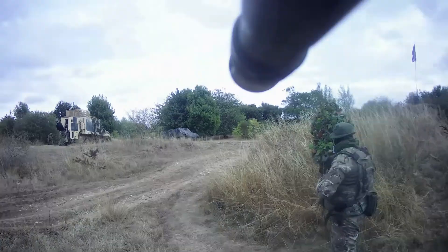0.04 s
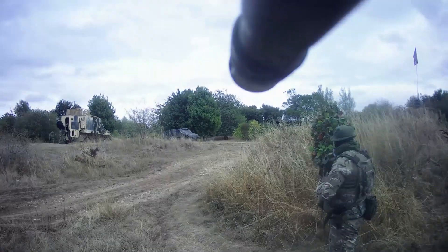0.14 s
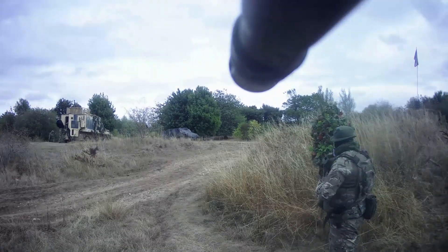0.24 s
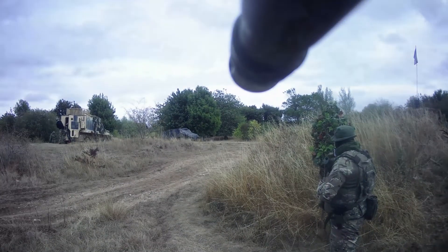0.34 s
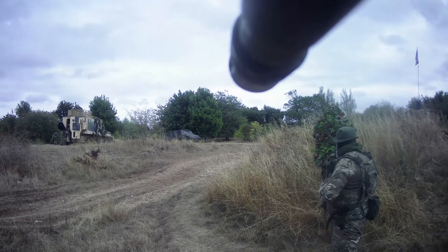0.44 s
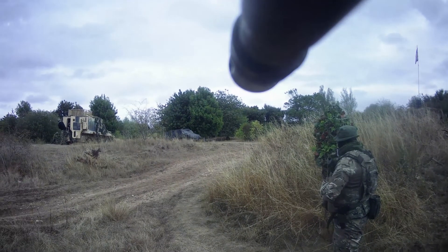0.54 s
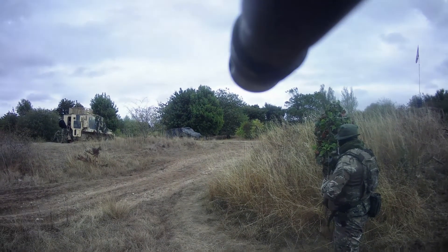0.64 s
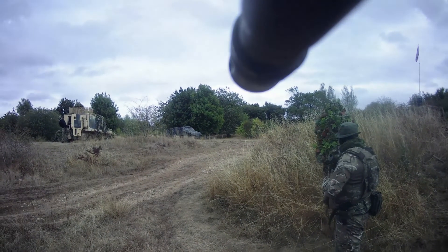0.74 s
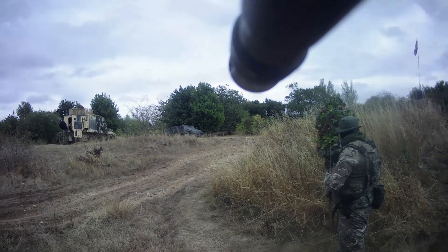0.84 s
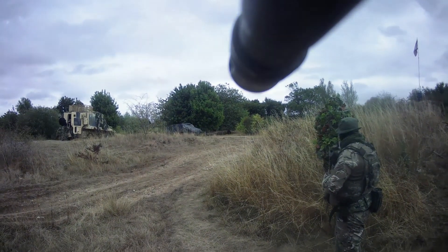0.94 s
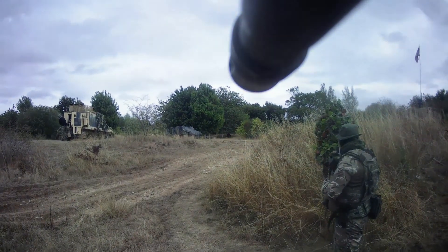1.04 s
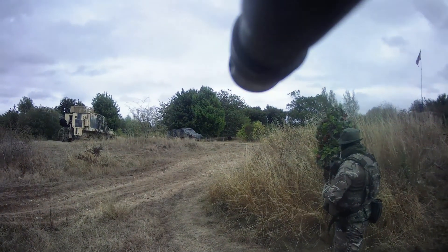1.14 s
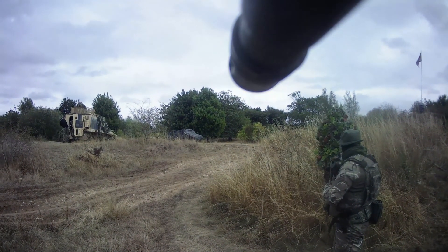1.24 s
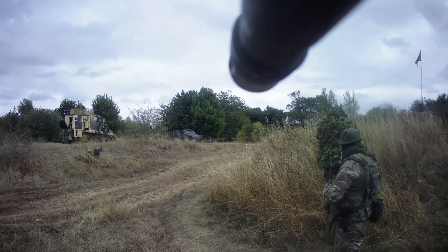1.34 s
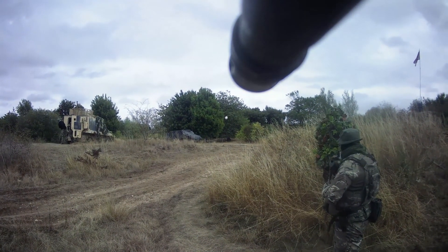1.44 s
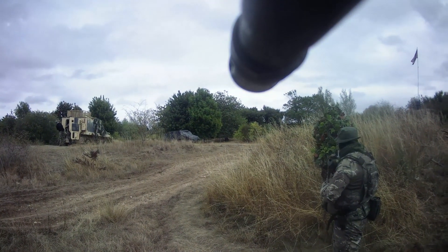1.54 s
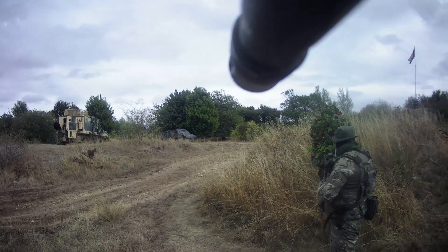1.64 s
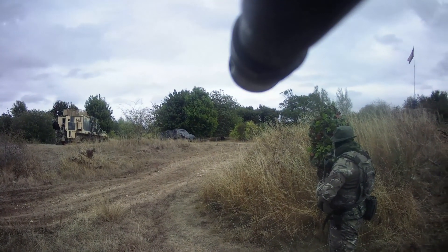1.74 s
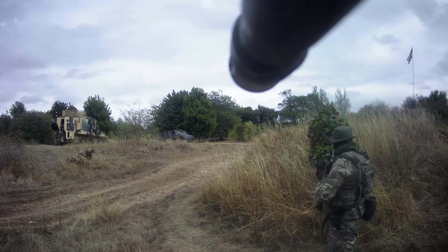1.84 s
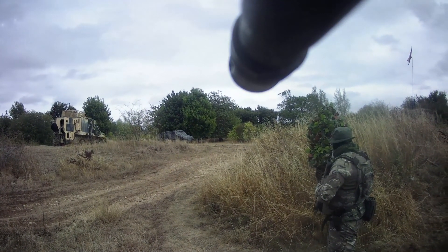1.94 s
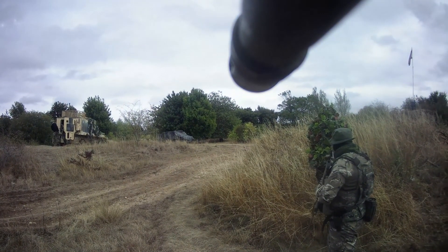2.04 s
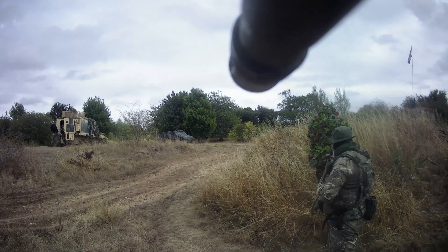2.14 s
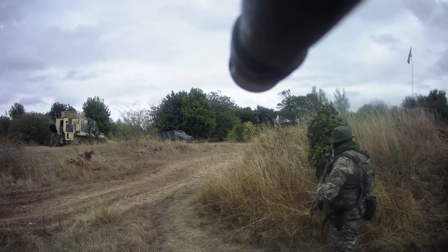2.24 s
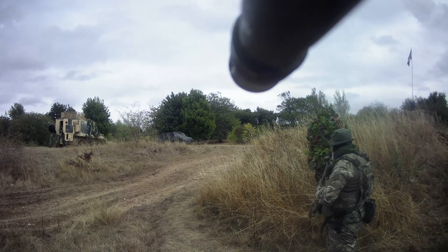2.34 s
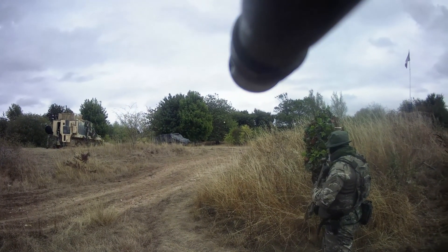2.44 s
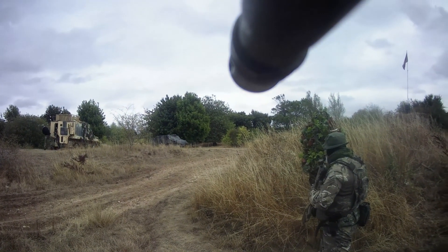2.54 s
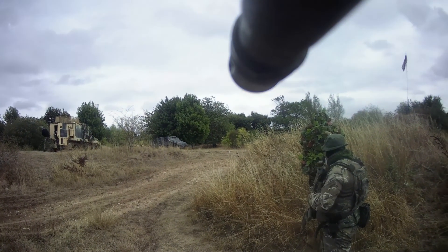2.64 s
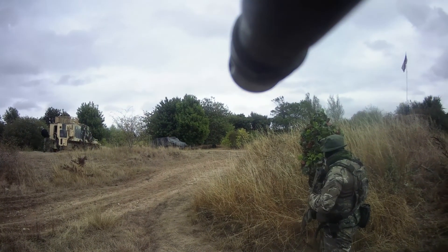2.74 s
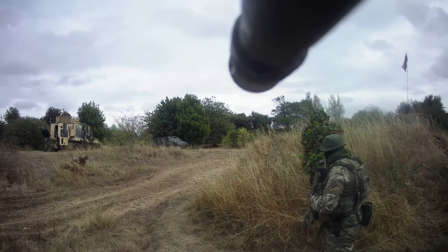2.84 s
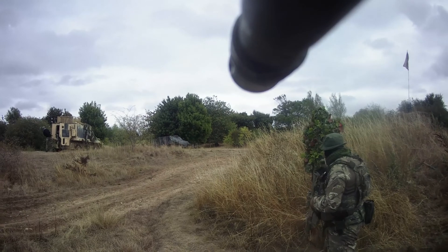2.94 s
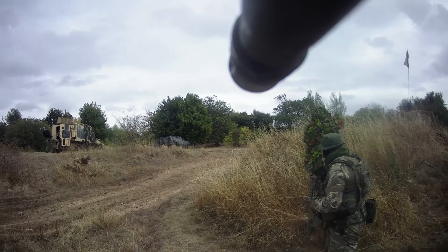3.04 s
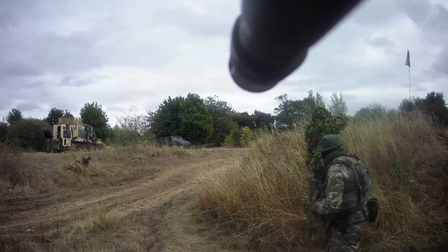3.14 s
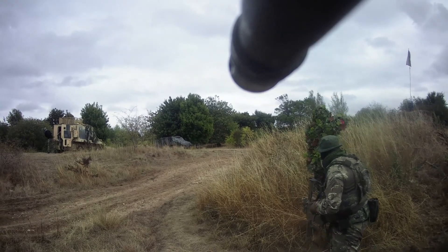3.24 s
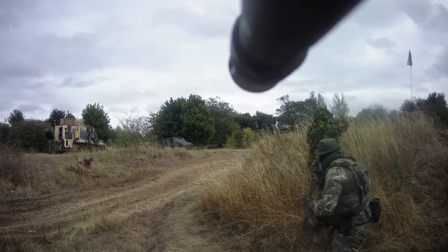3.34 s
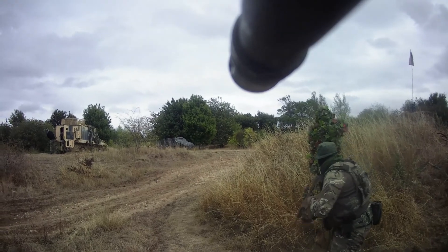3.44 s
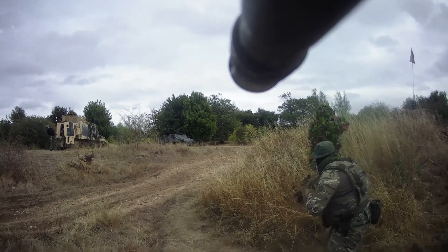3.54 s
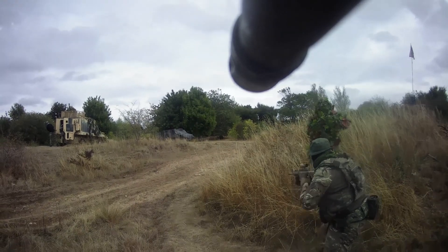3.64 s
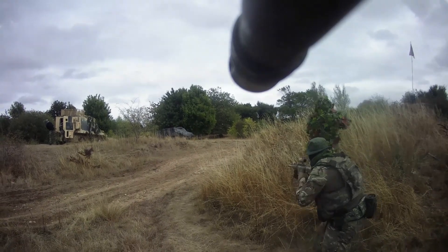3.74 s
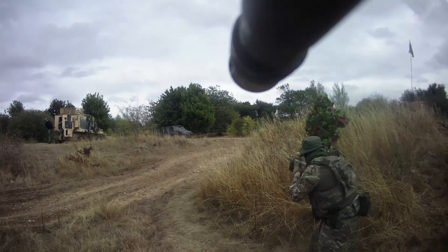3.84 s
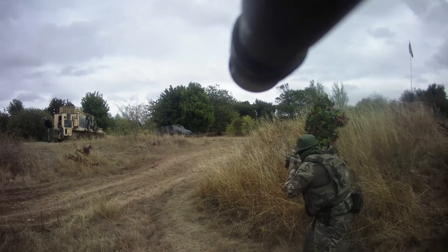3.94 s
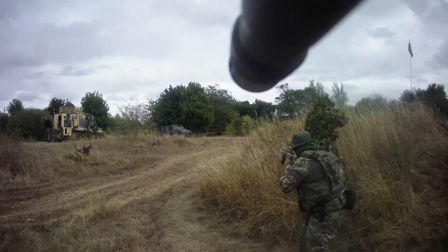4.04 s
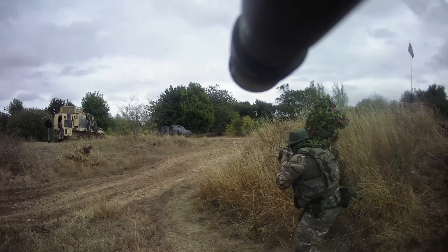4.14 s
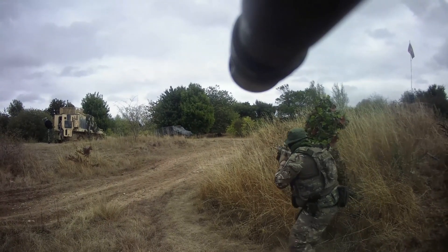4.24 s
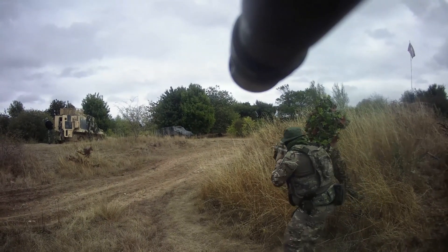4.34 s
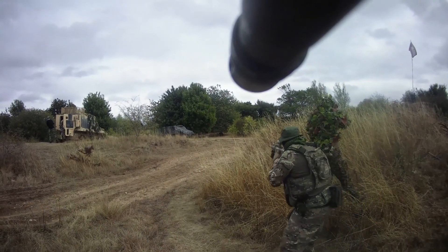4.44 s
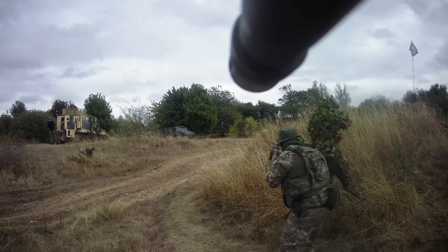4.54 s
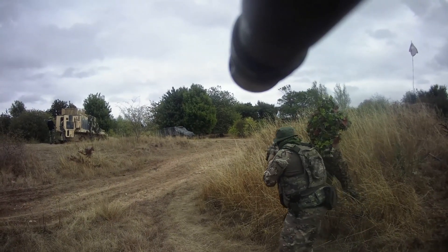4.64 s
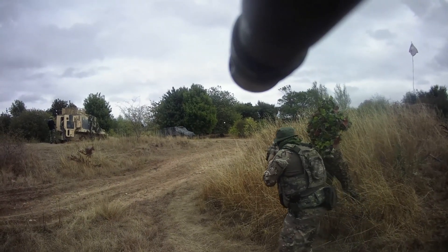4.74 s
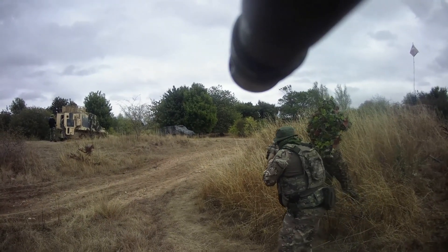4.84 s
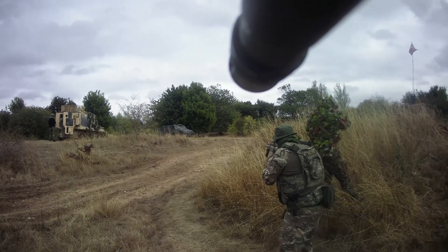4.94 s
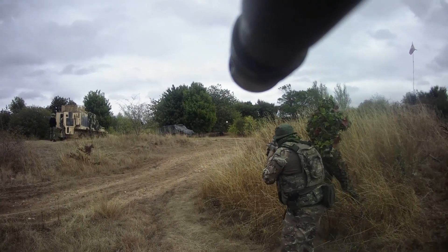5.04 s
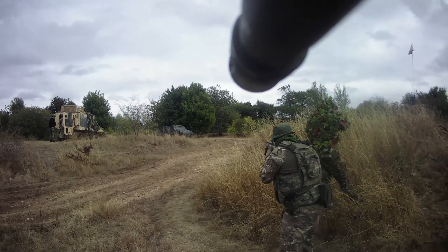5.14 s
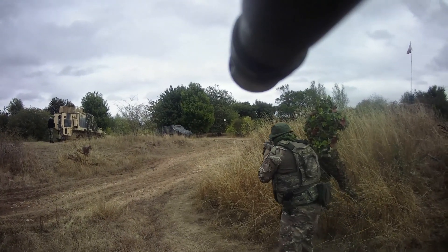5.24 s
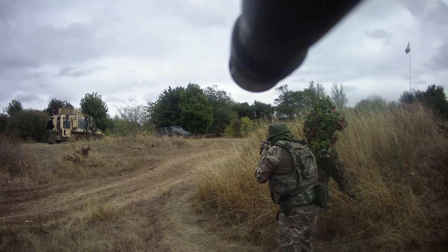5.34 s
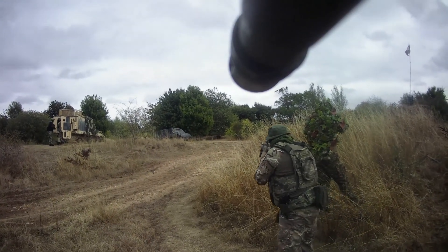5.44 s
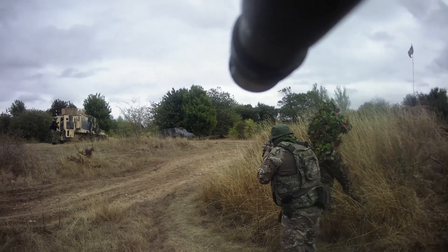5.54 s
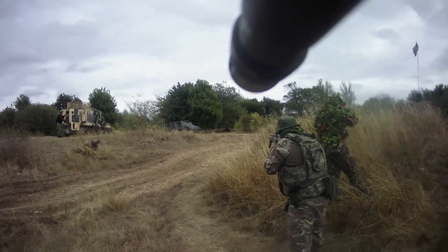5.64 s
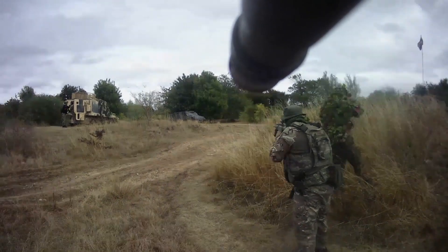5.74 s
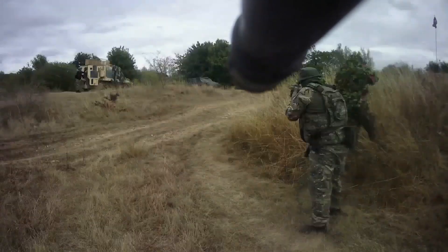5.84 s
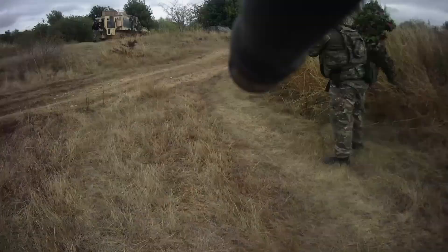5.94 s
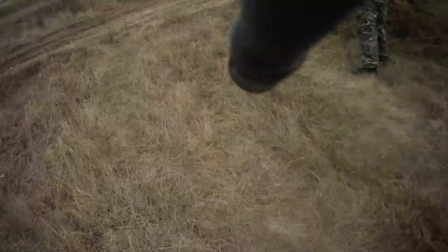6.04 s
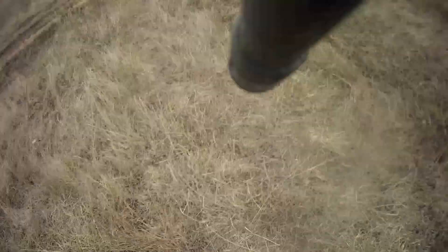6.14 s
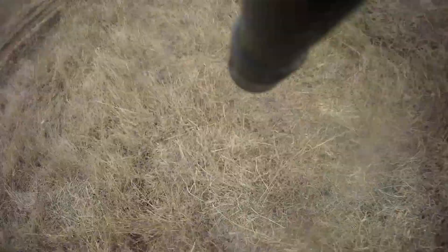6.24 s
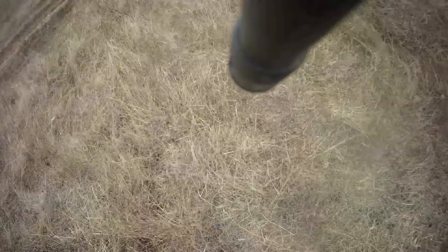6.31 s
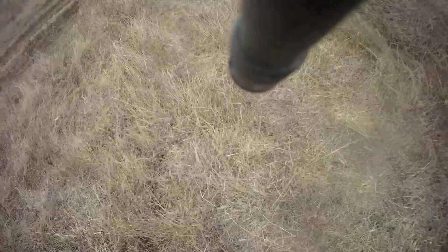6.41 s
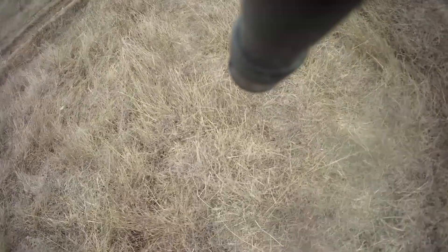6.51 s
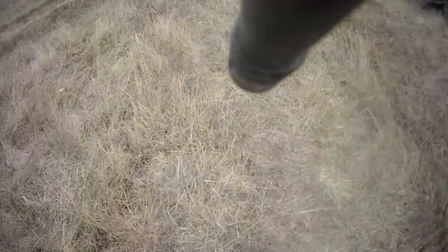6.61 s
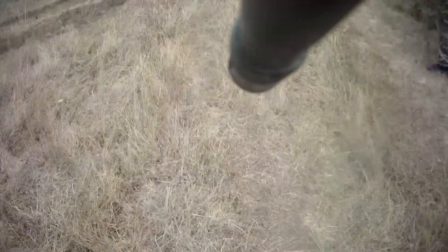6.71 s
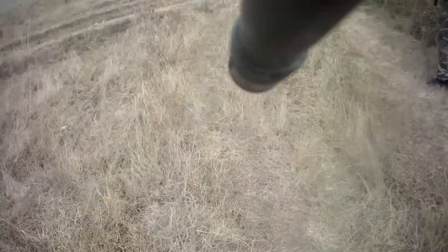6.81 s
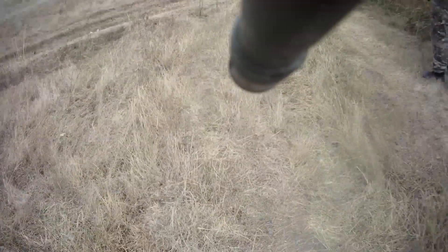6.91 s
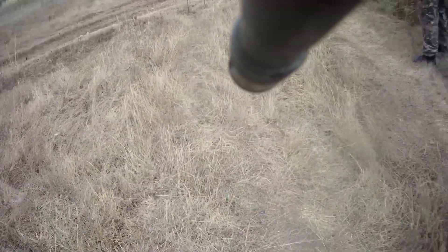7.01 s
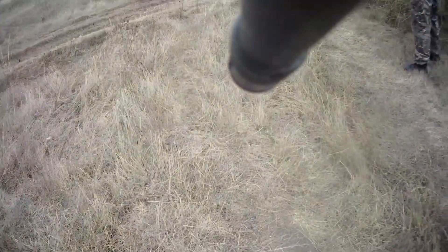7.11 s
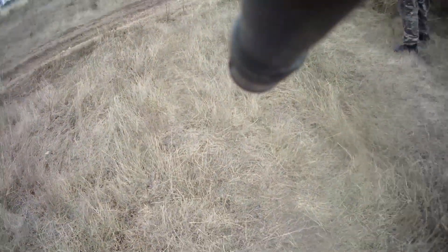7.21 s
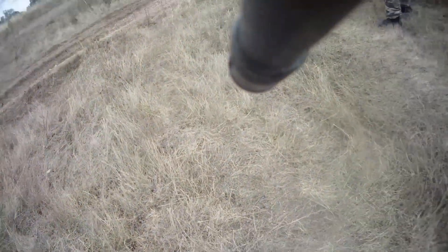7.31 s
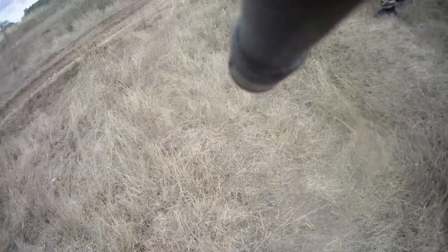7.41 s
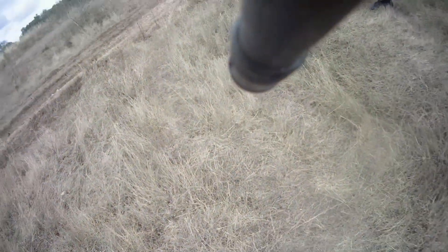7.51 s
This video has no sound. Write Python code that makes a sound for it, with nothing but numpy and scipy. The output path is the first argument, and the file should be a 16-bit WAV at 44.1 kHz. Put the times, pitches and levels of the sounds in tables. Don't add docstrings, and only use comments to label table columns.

```python
import sys
import numpy as np
from scipy import signal
from scipy.fft import rfft, irfft
from scipy.io import wavfile

SR = 44100
rng = np.random.default_rng(int(sys.argv[2]) if len(sys.argv) > 2 else 0)


def unload_audio(sound):
    columns = np.transpose(np.atleast_2d(sound))
    steps = np.round(np.clip(columns, -1, 1) * 32767)
    wavfile.write(sys.argv[1], SR, steps.astype(np.int16))


def how_loud(loudness_db):
    steps = np.asarray(loudness_db, float) / 20
    return 10 ** steps


N = 333837

# pawl click t/s, scrape level/dB, pawl level/dB
WHEEL_STROKES = [(5.8521, -57.5, -30), (6.0343, -58, -29.5), (6.241, -50.5, -45), (6.4433, -57.5, -25),
                 (6.563, -68, -34.5), (6.6418, -58.5, -25.5), (6.8153, -58.5, -27), (6.995, -59, -29),
                 (7.164, -59, -30), (7.3344, -59, -30.5), (7.5001, -60, -26.5)]
# t/s, peak level/dB
RATCHET_CLICKS = [
    (1.8716, -46.5),
    (1.915, -50.5),
    (1.9589, -51),
    (2.0005, -47.5),
    (4.158, -50.5),
    (4.2689, -52),
]


def resonance(x, hz, width_hz):
    r = np.exp(-np.pi * width_hz / SR)
    poles = [1, -2 * r * np.cos(2 * np.pi * hz / SR), r * r]
    return signal.lfilter(np.array([1, 0, -1]) * (1 - r * r) / 2, poles, x)


def ring(clicks, hz, t60):
    r = how_loud(-60 / (t60 * SR))
    w = 2 * np.pi * hz / SR
    return signal.lfilter([0, np.sin(w)], [1, -2 * r * np.cos(w), r * r], clicks + 1e-18)


def blow(clicks, hz, t60):
    return resonance(ring(clicks, hz, t60), hz, hz)


def train(times, gains):
    out = np.zeros(N)
    places = np.clip((np.asarray(times) * SR).astype(int), 0, N - 1)
    np.add.at(out, places, gains)
    return out


def dying(clicks, t60):
    return signal.lfilter([1], [1, -how_loud(-60 / (t60 * SR))], clicks + 1e-18)


def band(x, low_hz, high_hz):
    return signal.sosfilt(signal.butter(2, [low_hz, high_hz], "band", fs=SR, output="sos"), x)


def drift(rate):
    r = np.exp(-2 * np.pi * rate / SR)
    slow = signal.lfilter([1], [1, -2 * r, r * r], rng.standard_normal(N + SR))[SR:]
    return slow / slow.std()


def coloured(spectrum):
    hz, level_db = np.transpose(spectrum)
    grid = np.maximum(np.fft.rfftfreq(N, 1 / SR), 1)
    gain = how_loud(np.interp(np.log(grid), np.log(hz), level_db))
    out = irfft(rfft(rng.standard_normal(N)) * gain, N)
    return out / out.std()


def body(force):
    # f/Hz, width/Hz, level/dB
    shell_modes = [(660, 136.6, 2.5), (810, 190, 0), (917, 129, 0.5), (1327, 80, 1.5), (1585, 336, -2),
                   (2056, 93, 2.5), (2316, 213, -3.5), (2943, 300, -7), (3323, 118, 1.5), (3550, 104.5, 3),
                   (4170, 245, -10.5)]
    # f/Hz, width/Hz, level/dB
    fittings = [(5913, 860, -22), (5830, 170, -39.5), (6630, 380, -21.5), (7200, 350, -27),
                (8100, 180, -37.5), (8300, 410, -36), (9770, 800, -38)]
    rung = sum((-1) ** k * how_loud(db) * resonance(force, hz, width) for k, (hz, width, db) in enumerate(shell_modes))
    shell = signal.sosfilt(signal.butter(4, 4600, fs=SR, output="sos"), band(rung, 350, 10000))
    metal = sum(how_loud(db) * resonance(resonance(force, hz, width), hz, width) for hz, width, db in fittings)
    return shell + metal


def air():
    # t/s, gust level/dB, grip level/dB
    weather = [(0, -84, -77.5), (.2, -72, -76), (.7, -69.5, -72), (.88, -63, -76.5), (1.06, -61, -76.5),
               (1.39, -76, -74), (2.04, -76, -69.5), (2.88, -59, -62.5), (3.07, -59.5, -70),
               (4.04, -67.5, -61), (4.19, -59, -69.5), (4.42, -60, -65.5), (5.76, -54, -52),
               (6.09, -59, -52.5), (6.4, -49, -50.5), (7.054, -53.5, -50.5), (7.176, -57, -56.5),
               (7.57, -55.5, -53)]
    # f/Hz, level/dB per Hz
    buffet = [(15, -8), (40, -8), (90, 0), (150, 1.5), (230, -0.5), (330, -19), (600, -53)]
    # f/Hz, level/dB per Hz
    rub = [(120, -29.5), (220, -1), (330, -2), (550, -8), (850, -17), (1500, -24), (4000, -58.5)]
    # f/Hz, level/dB per Hz
    field = [(150, -20.5), (350, -10.5), (670, -2.5), (1500, -5), (2200, -13), (3200, -18), (5000, -25.5),
             (12000, -53.5)]
    s, buffet_db, rub_db = np.transpose(weather)
    field_db = -70.5 + 0.03 * (rub_db - rub_db.mean())
    t = np.arange(N) / SR
    out = 0
    layers = ((buffet_db, 2.5, 14, buffet), (rub_db, 2.5, 20, rub), (field_db, 1.5, 15, field))
    for level_db, lump_db, lump_hz, spectrum in layers:
        level = how_loud(np.interp(t, s, level_db) + lump_db * drift(lump_hz))
        out = out + level * coloured(spectrum)
    return out


def hums():
    # start t/s, end t/s, f/Hz, level/dB
    singing = [
        (0.054, 0.152, 1410, -71),
        (.18, 0.256, 1420, -76),
        (0.005, 0.332, 682, -75),
        (2.86, 3.062, 3550, -82),
        (2.867, 3.075, 660, -69),
        (4.03, 4.401, 660, -70),
        (1.87, 2.04, 4300, -86),
        (6.523, 6.581, 667, -45),
    ]
    t = np.arange(N) / SR
    noise = rng.standard_normal(N)
    out = 0
    for start, end, hz, db in singing:
        fade = np.interp(t, [start, start + 0.011, end - .015, end], [0, 1, 1, 0])
        out = out + how_loud(db + 31.0) * fade * resonance(resonance(noise, hz, 35), hz, 35)
    return out


def ticks():
    # t/s, peak level/dB, bright part level/dB
    crisp = [(.0353, -45.5, -28), (0.115, -51, -7), (.1426, -41.5, -7), (.3242, -45, -15),
             (.3441, -33, -7.5), (.3574, -37.5, -13), (.3834, -48, -21), (.5132, -41.5, -17),
             (.6389, -43, -23), (.7168, -50, -6), (.7866, -37.5, -7), (.853, -40, -2), (.8749, -37, -10),
             (0.9962, -58, 9), (1.0071, -42.5, -5), (1.0695, -53, -17), (1.3397, -39.5, -11),
             (4.395, -52, -30), (4.0394, -41, -15), (4.0637, -43, -9), (5.721, -32, -8), (5.9165, -53, -14),
             (6.115, -42.5, -7), (6.222, -32, -12), (6.1384, -25.5, -10), (6.1759, -45, -21),
             (6.3545, -43, -20), (6.4243, -46, -17), (6.6099, -27.5, -26), (6.7506, -38, -10),
             (6.9416, -50, -12)]
    # t/s, peak level/dB
    dull = [(.4848, -55), (.5432, -51), (.5574, -58), (.8076, -56), (.9018, -54), (.9664, -53),
            (.9777, -51), (1.1694, -58), (1.3594, -64), (3.0134, -56.5), (5.8396, -38.5), (6.2794, -38.5),
            (6.4058, -50), (6.5261, -49), (6.9002, -56), (7.2384, -53)]
    # t/s, peak level/dB
    backlash = [
        (1.4142, -30),
        (1.7804, -40),
        (1.7968, -21),
        (1.8174, -33),
        (2.8479, -27),
        (3.0839, -30),
        (3.9669, -17.5),
        (3.9958, -25),
    ]
    tongue = [(s, db - 9) for s, db in RATCHET_CLICKS]
    pawl = []
    for s, scrape_db, db in WHEEL_STROKES:
        pawl += [(s, db), (s + .026, db - 20)]
    # events, low part dB, bright part dB
    kinds = ((dull, 7, -13), (backlash, 4.5, -26), (tongue, -13, -17), (pawl, -21, -15))
    rows = [(s, db, -8, bright_db) for s, db, bright_db in crisp]
    for events, low_db, bright_db in kinds:
        rows += [(s, db, low_db, bright_db) for s, db in events]
    return np.array(rows)


def handling():
    s, peak_db, low_db, bright_db = ticks().T
    noise = rng.standard_normal(N)
    low = band(noise * dying(train(s, how_loud(peak_db + low_db + 9)), 0.062), 305, 1160)
    middle = band(noise * dying(train(s, how_loud(peak_db + 4.5)), 0.021), 730, 2280)
    bright = band(noise * dying(train(s, how_loud(peak_db + bright_db + 11.0)), 0.014), 2400, 6100)
    middle += band(train(s, how_loud(peak_db + 16)), 600, 1900)
    through_body = body(low + middle + how_loud(-1.0) * bright)
    return through_body + how_loud(-21) * middle + how_loud(-17.5) * bright


def latch():
    # t/s, level/dB
    cracks = [
        (6.238, -25.5),
        (6.244, -15.5),
        (6.248, -19.5),
        (6.254, -17.5),
    ]
    # t/s after the first crack, f/Hz, level/dB, t60/s
    catch_rings = [
        (-.016, 1500, -42, .015),
        (.001, 1670, -15, .008),
        (.002, 700, -22, 0.035),
        (.007, 1490, -24, .011),
        (.011, 248, -21, 0.033),
        (0.012, 720, -1.5, 0.0045),
        (.016, 1020, -18.5, .021),
        (.014, 1670, -18.5, 0.027),
        (.024, 637, -24.5, 0.05),
    ]
    # t/s, f/Hz, level/dB, t60/s
    pins = [(.358, 635, -40, 0.014), (.515, 684, -49, 0.04), (.558, 675, -45.5, 0.036),
            (.904, 650, -36, 0.021), (4.503, 1414, -8, 0.0094), (6.115, 958, -39.5, 0.022),
            (6.139, 1520, -29.5, 0.017), (6.611, 3400, -27.5, .029), (6.611, 5650, -55, 0.017),
            (7.166, 1070, -37, 0.022), (7.345, 3560, -42.5, 0.016)]
    s, db = np.transpose(cracks)
    crackle = band(rng.standard_normal(N) * dying(train(s, how_loud(db)), 0.021), 810, 2800)
    pings = [(s[0] + lag, hz, level_db, t60) for lag, hz, level_db, t60 in catch_rings] + pins
    return crackle + sum(blow(train([at], how_loud(level_db)), hz, t60) for at, hz, level_db, t60 in pings)


def motor():
    # share of wind-up 0-1, mesh f/Hz, effort level/dB
    spin_up = [(0, 300, -48), (.19, 630, -28.5), (.42, 1120, -25), (.76, 1420, -22), (1, 2065, -18)]
    # share of coast 0-1, mesh f/Hz, effort level/dB
    run_down = [(0, 2130, -18), (.24, 1630, -19), (.5, 1150, -24), (.78, 660, -30), (1, 400, -40)]
    # share of creep 0-1, mesh f/Hz, effort level/dB
    creep_back = [(.08, 380, -52), (.45, 300, -49), (1, 200, -80)]
    # pull t/s, full speed t/s, eagerness (1 = usual)
    pulls = [
        (1.4, 1.505, 1.0),
        (2.05, 2.17, 1.45),
        (3.08, 3.175, 1.0),
        (4.429, 4.525, 1.0),
    ]
    # let go t/s, stall t/s, braking (1 = usual), creep after stall t/s
    stops = [
        (1.64, 1.748, .8, .095),
        (2.755, 2.83, .9, .03),
        (3.85, 3.922, .9, .11),
        (5.585, 5.722, 1.9, .014),
    ]
    bursts = []
    for (pull, full, eager), (free, stall, brake, creep) in zip(pulls, stops):
        phases = ((pull, full - pull, eager, spin_up), (free, stall - free, brake, run_down),
                  (stall, creep, 1, creep_back))
        bursts.append([(start + share ** bend * length, hz, db)
                       for start, length, bend, shape in phases for share, hz, db in shape])
    return bursts


def releases():
    # t/s, slam level/dB
    lone_shots = [
        (1.491, -20),
        (2.149, -16.5),
        (3.154, -26.5),
        (4.51, -28),
        (5.626, -26),
    ]
    # first t/s, last t/s, slam level/dB
    volleys = [
        (1.581, 1.666, -28.5),
        (2.24, 2.744, -27),
        (3.253, 3.838, -27),
        (4.605, 5.534, -27),
    ]
    cycle_s = .0842
    shots = list(lone_shots)
    for first, last, db in volleys:
        count = round((last - first) / cycle_s) + 1
        shots += [(s, db) for s in np.linspace(first, last, count)]
    return np.array(sorted(shots))


def gearbox():
    # t/s after release, speed change/%, tooth tone, overtone, rattle level/dB
    load = [
        (0, -2, 1, -6, 0),
        (.012, 4, -3, -8, 0),
        (.035, 8, -2, -5, 0),
        (.047, 6, -1, -1, -1),
        (.058, 0, -9, 2, -2.5),
        (.071, -6, -10, -3, -4),
        (.076, -7, 2, -7, -1.5),
    ]
    # multiple of mesh, level/dB running up or down, level/dB at full speed
    teeth = [(1, 0.5, -3), (2, -8.5, -3.5), (3, -15, -9.5)]
    t = np.arange(N) / SR
    bursts = motor()
    mesh = np.interp(t, *np.concatenate(bursts).T[:2])
    effort = sum(how_loud(np.interp(t, s, db, left=-200, right=-200)) for s, hz, db in map(np.transpose, bursts))
    fired = releases()[:, 0]
    since = t - fired[np.maximum(np.searchsorted(fired, t) - 1, 0)]
    after, change, tone_db, over_db, rattle_db = np.transpose(load)
    loaded = (np.abs(since) < .1) * np.clip(mesh / 600 - 2.5, 0, 1)
    ripple = loaded * np.interp(since, after, change) / 100
    turns = np.cumsum(mesh * (1 + ripple + .011 * drift(100))) / SR

    tone = 0
    for k, slow_db, fast_db in teeth:
        cycle_db = np.interp(since, after, over_db if k == 2 else tone_db)
        uneven_db = np.minimum((4 + 1.5 * loaded) * drift(80), 5)
        level_db = slow_db + loaded * (fast_db - slow_db + cycle_db) + uneven_db
        tone = tone + how_loud(level_db) * np.sin(2 * np.pi * k * turns)
    tone *= effort

    strength = how_loud(2.3 * np.minimum(rng.exponential(1, N), 5))
    knocks = strength * rng.choice([-1, 1], N) * (rng.random(N) < 7000 / SR)
    wobble = 1 + 0.24 * np.sin(2 * np.pi * turns / 11.5) + 0.18 * np.sin(2 * np.pi * turns / 30)
    level_db = 8.5 + loaded * np.interp(since, after, rattle_db) + 0.65 * drift(40)
    rattle = effort * knocks / knocks.std() * wobble * how_loud(level_db)

    fizz = rattle * np.clip(drift(9) + .3, 0, 1)
    glints = how_loud(-32) * resonance(resonance(fizz, 11250, 450), 11250, 450)
    shake = how_loud(-19.0) * band(rattle, 75, 320)
    airborne = how_loud(-17) * band(tone, 250, 2500)
    return glints + shake + body(rattle + tone * wobble) + airborne


def piston():
    # t/s after release, f/Hz, level/dB, t60/s
    contacts = [(-.009, 700, 3, .012), (-.004, 330, -4, .012), (.001, 1750, 10, .007), (.003, 330, 3, .014),
                (.004, 850, 11, .014), (.006, 140, -15, .03), (.005, 205, -3, .022), (.009, 1400, 7, .008),
                (.005, 1600, 12, .009), (.022, 430, 5, .012), (.024, 740, 9, .035)]
    # t/s after release, level/dB, t60/s
    air_cracks = [
        (.001, 0, 0.013),
        (.0045, 1.5, 0.013),
        (0.022, -9, .012),
    ]
    fired, slam_db = releases().T
    slam_db = slam_db + 1.5 * rng.standard_normal(len(fired))
    blows, hiss = 0, 0
    for lag, hz, db, t60 in contacts:
        size_db = np.where(lag < .02, slam_db, -26.5)
        chance = rng.normal(0, 1, (len(fired), 2))
        times = fired + lag + 0.0004 * chance[:, 0]
        blows = blows + blow(train(times, how_loud(size_db + db + 0.5 * chance[:, 1])), hz, t60)
    for lag, db, t60 in air_cracks:
        hiss = hiss + dying(train(fired + lag, how_loud(slam_db + db + 22.5)), t60)
    hiss *= rng.standard_normal(N)
    snap = how_loud(-18) * band(hiss, 4000, 5400)
    snap += how_loud(-19.5) * resonance(hiss, 6760, 500)
    snap += how_loud(-42.0) * band(hiss, 7200, 11000)
    landing = train(fired + .003, how_loud(slam_db + 25))
    snap += band(band(landing, 500, 4500), 500, 4500)
    return how_loud(2.0) * blows + how_loud(-8.5) * body(hiss) + snap


def ratchet():
    s, db = np.transpose(RATCHET_CLICKS)
    touches = train(s, how_loud(db)) + train(s - .0135, how_loud(db - 8))
    scrape = rng.standard_normal(N) * dying(touches, 0.033)
    return how_loud(-6 + 9.5) * resonance(scrape, 2580, 580)


def feed_wheel():
    # f/Hz, level/dB per Hz
    scrape = [(300, -8), (700, -6), (1500, 8.5), (2300, -1.5), (4500, -5.5), (6500, -22), (7500, -71.5),
              (11000, -46)]
    lag_s, rise_s, fall_s = 0.012, 0.044, 0.035
    t = np.arange(N) / SR - lag_s
    swell = 0
    for s, db, pawl_db in WHEEL_STROKES:
        width_s = np.where(t < s, rise_s, fall_s)
        swell = swell + how_loud(db) * np.exp(-((t - s) / width_s) ** 2)
    grit = how_loud(3 * drift(200))
    return swell * coloured(scrape) * grit


def scene():
    between_bursts = air() + hums() + handling() + latch()
    firing = gearbox() + piston()
    return (between_bursts + firing + ratchet() + feed_wheel())[None]


def band_limit(x):
    return signal.sosfilt(signal.butter(12, 12710, fs=SR, output="sos"), x)


def record(dry):
    ceiling, self_noise_db = 1.03, -80
    heard = ceiling * np.tanh(1.371 * dry / ceiling)
    heard = heard + how_loud(self_noise_db) * rng.standard_normal(dry.shape)
    heard = signal.sosfilt(signal.butter(2, 55, "high", fs=SR, output="sos"), heard)
    heard = signal.sosfilt(signal.cheby2(10, 50, 12500, fs=SR, output="sos"), heard)
    return band_limit(heard)


dry = scene()
out = record(dry)
unload_audio(out)
```